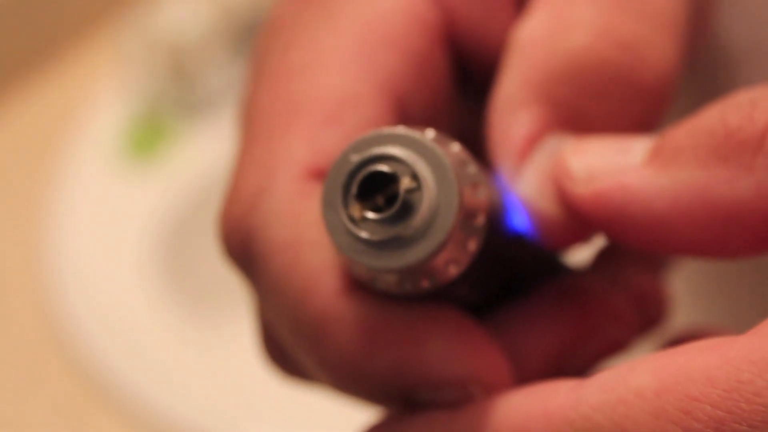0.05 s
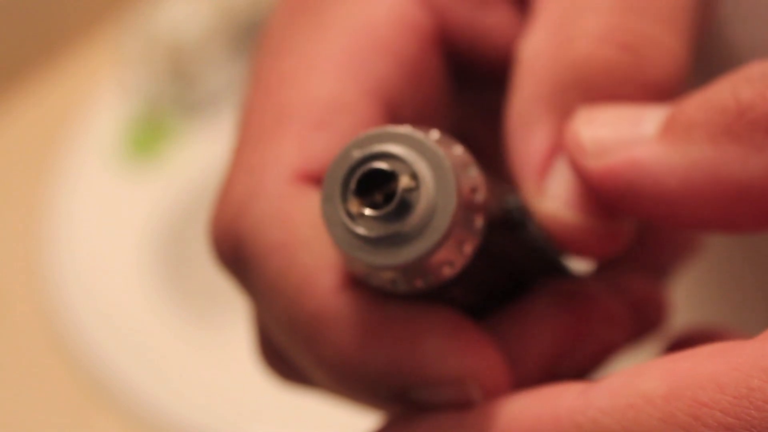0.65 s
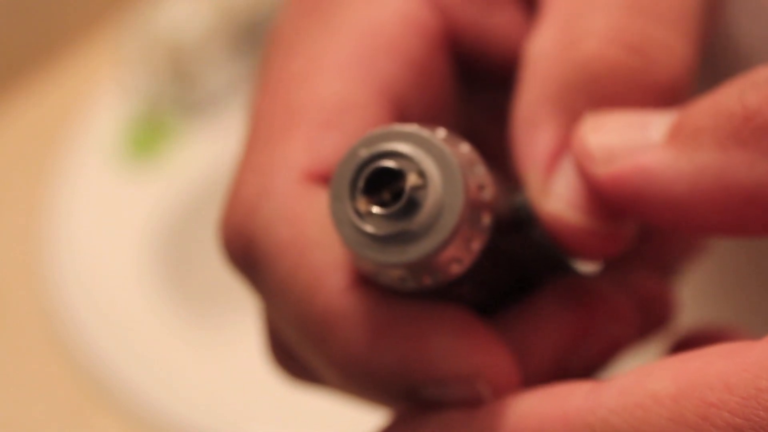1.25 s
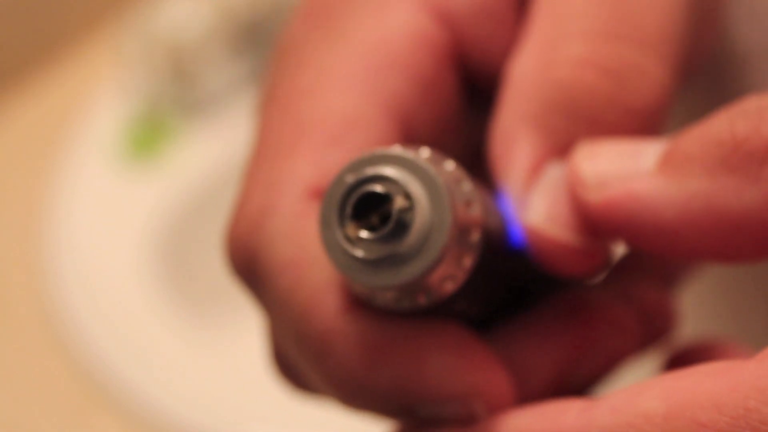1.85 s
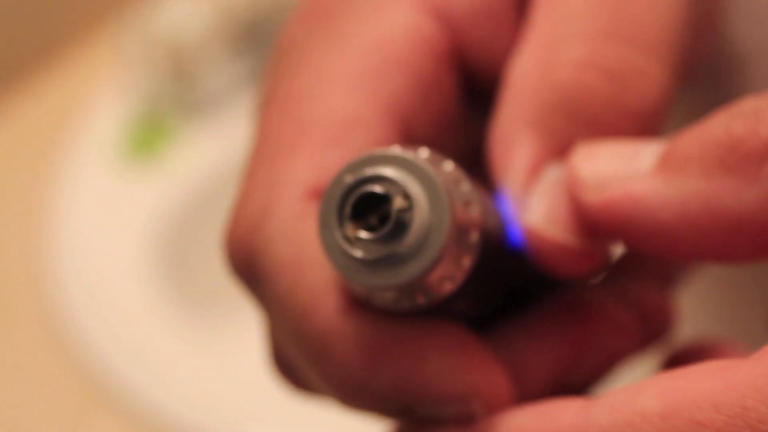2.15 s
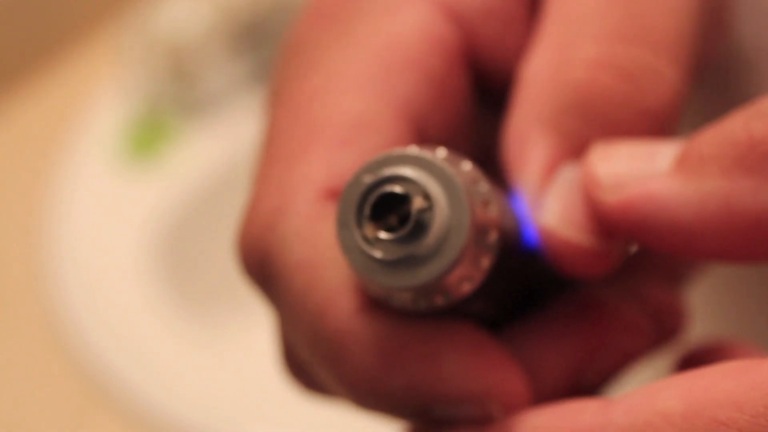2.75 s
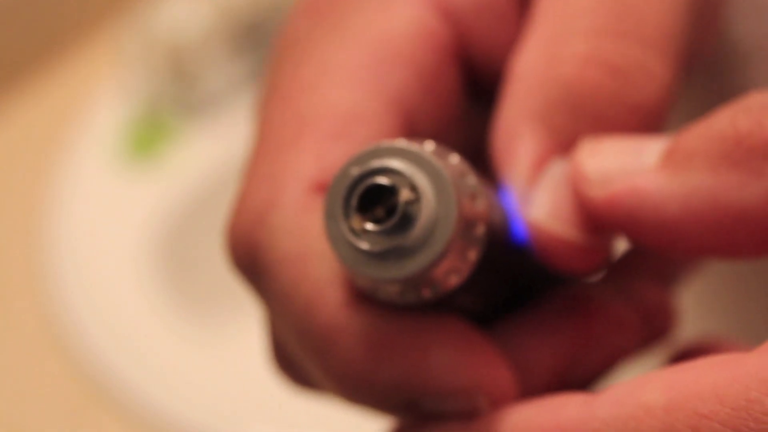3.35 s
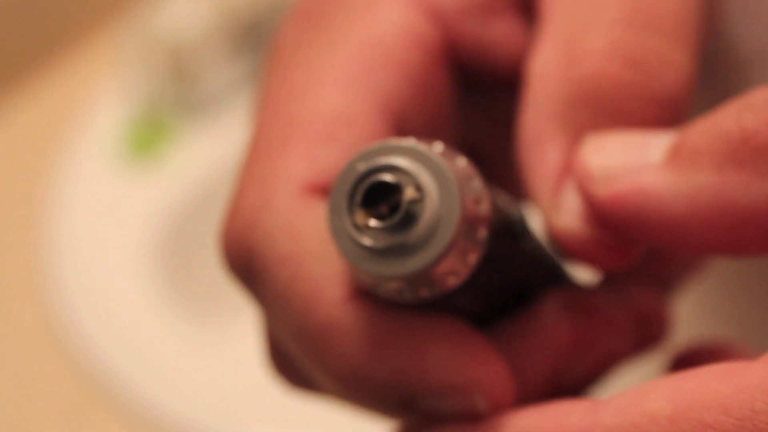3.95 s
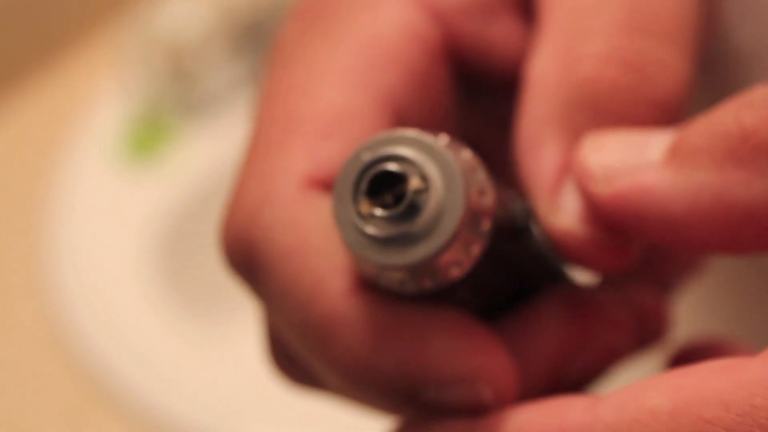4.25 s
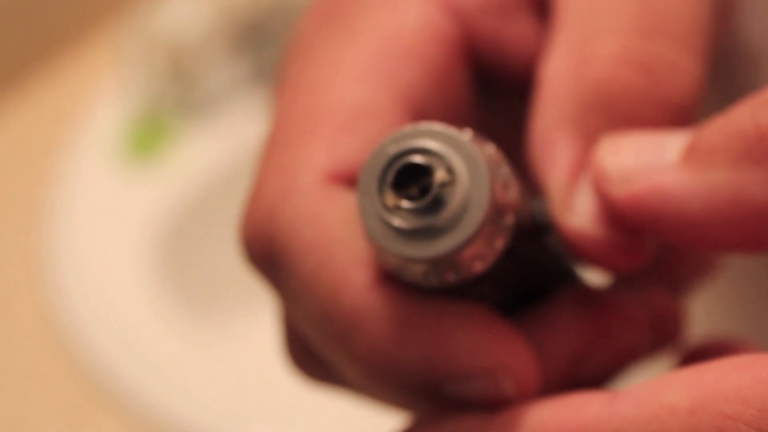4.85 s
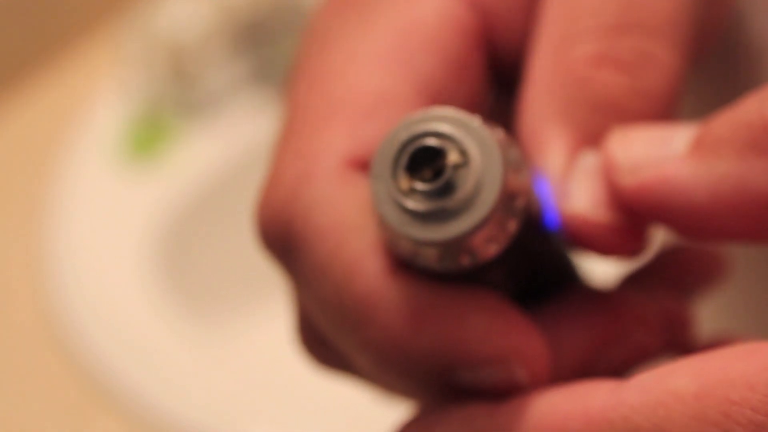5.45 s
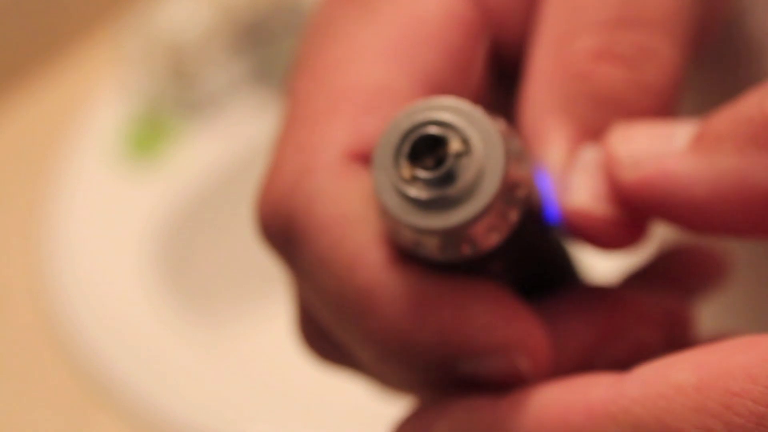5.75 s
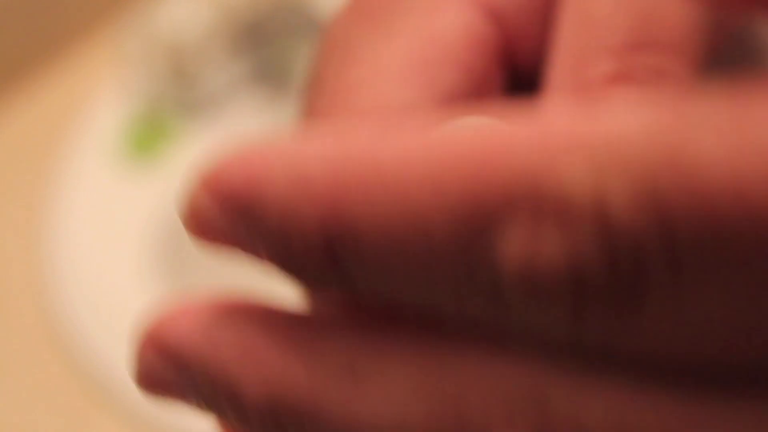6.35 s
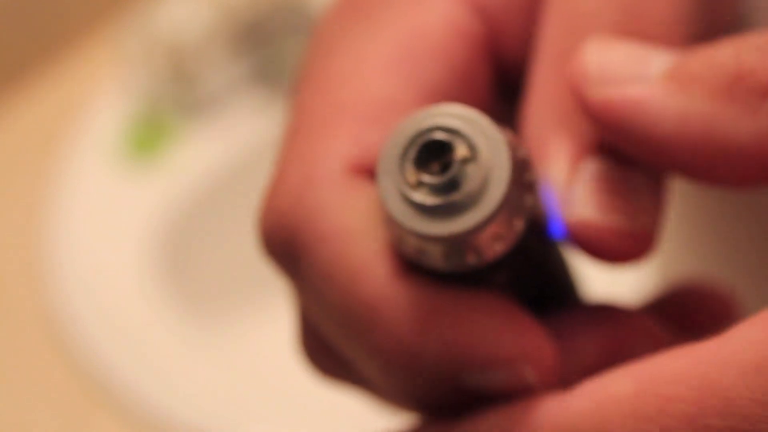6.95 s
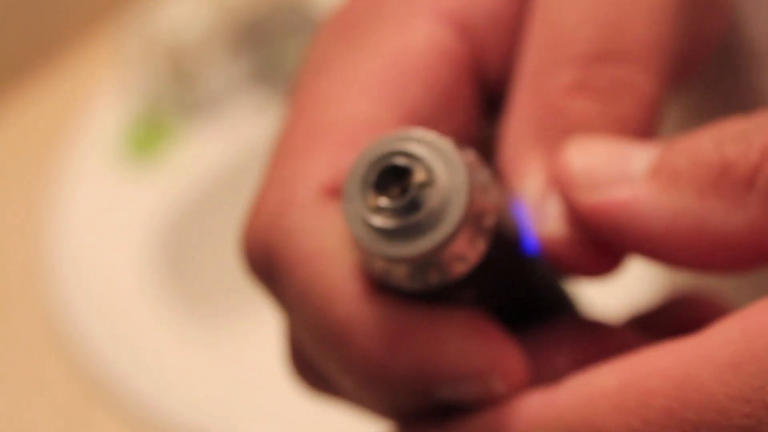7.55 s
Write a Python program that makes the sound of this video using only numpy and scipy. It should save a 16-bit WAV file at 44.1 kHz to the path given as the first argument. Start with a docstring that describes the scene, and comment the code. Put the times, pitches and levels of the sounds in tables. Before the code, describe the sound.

A bare vape coil is fired three times, close to the microphone in a small quiet room with soft background noise and a faint mains hum. A thin, bright sizzle is there from the start and cuts off with sharp pops at 0.3 seconds. After a pause and a faint click, the coil fizzes again from 1.8 seconds, with a brief spit and scattered crackles and pops. From 3.1 seconds it spits in a fast, accelerating rattle, stopping at 3.9. The cooling metal ticks faintly once at about 4 seconds. The third firing starts at 5.3 seconds and is louder, with the sharpest pops around 5.5 and another rapid spitting rattle until 6.3. The sizzle shifts slightly in tone around 6.5 seconds as a hand passes over it, then keeps hissing and crackling, slowly growing, until the end at about 7.7 seconds.

```python
"""A bare vape coil is fired three times, close to the microphone in a small quiet room.
As the wire warms, liquid on it fizzes and crackles, bursts in sharp pops and at times spits in a fast
regular rattle. Each burst is a spike coloured by the metal cup round the coil. The cooling metal ticks
once; a passing hand shades and reflects the sound. Soft room noise and mains hum lie underneath."""
import sys
import numpy as np
from scipy import signal
from scipy.fft import rfft, irfft
from scipy.io import wavfile
from scipy.ndimage import map_coordinates

SR = 44100
rng = np.random.default_rng(int(sys.argv[2]) if len(sys.argv) > 2 else 0)


def log_audio(samples):
    """Write samples as a 16-bit WAV file to the path given in sys.argv[1]."""
    # one column per channel
    frames = np.atleast_2d(samples).T
    # limit to full scale, then quantise
    limited = np.clip(frames, -1, 1)
    pcm = np.round(limited * 32767).astype(np.int16)
    wavfile.write(sys.argv[1], SR, pcm)


N = 340452
TIME_S = np.arange(N) / SR

# coil firings: (on [s], off [s], hot fizz level [dB], growth [dB/s])
FIRINGS = [(-.3, .318, -44.5, -1), (1.842, 3.87, -45, -0.3), (5.29, 7.8, -38.5, 1.45)]
# spectrum of one burst: (frequency [Hz], level [dB])
BURST_SPECTRUM = [(750, -15.5), (1200, -16), (2200, -13), (3800, -11), (5200, -6.5), (8000, -3.5),
                  (9200, -1), (10300, -0.5), (13000, 3), (14500, 3), (16000, -8.5)]
# air resonances of the cup: (centre [Hz], width [Hz], lift [dB])
CUP_RESONANCES = [(1524, 420, 7), (2020, 190, 4), (3035, 680, 7), (4370, 240, 7.5), (6830, 380, 8.5),
                  (9120, 360, -10.5), (11830, 520, 2), (13800, 300, -3.5)]
# room noise: (frequency [Hz], relative density [dB])
NOISE_SPECTRUM = [(20, 2), (40, -8), (80, -7), (160, -3), (300, -.8), (600, 0), (1500, -1.8), (3000, -3.8),
                  (6000, -7.3), (9500, -11), (16000, -9.3)]
# sharp pops and one faint click: (time [s], level [dB], tilt [dB/oct], colour peak [Hz])
POPS = [(0.1164, -17, 0, 2800), (0.148, -14, 3, 4700), (0.1592, -16.5, 0, 6200), (0.3172, -16, 3, 1200),
        (0.3196, -7.5, -1, 6860), (0.3211, -4, -3, 7100), (1.7632, -28.5, 1, 11400),
        (1.842, -23.5, 5, 11200), (1.875, -13.8, 3, 5900), (1.9655, -14.5, 0.5, 1400),
        (2.0228, -14.5, -1, 6200), (2.0423, -18, -1, 1600), (2.053, -15.5, -2, 7900),
        (2.1748, -16, -0.2, 4300), (2.4317, -10, 1.5, 4000), (2.4877, -19, -4, 8300),
        (2.4925, -15.5, -0.5, 1600), (2.6306, -19, -3.5, 5700), (2.9236, -18.5, -3.5, 6500),
        (2.9746, -12, -2, 1700), (3.0206, -12.5, 4, 6500), (3.0586, -17.5, 0, 6000), (3.084, -15, 1, 5500),
        (3.596, -15.5, -1, 12900), (3.8131, -12.5, -1.5, 3160), (3.8416, -12.5, -1, 6500),
        (5.3068, -20.5, 3, 4300), (5.4102, -7, -2, 4300), (5.4436, -12.5, 1.5, 6400),
        (5.5118, -2, -0.5, 8200), (5.5283, -2.8, -1, 9700), (5.6414, -11.5, 0, 6650),
        (5.6785, -9.5, -1.5, 7600), (5.6918, -9.5, 0.5, 6500), (5.743, -8, -2, 6000),
        (6.1551, -10, 5, 4300), (6.3458, -8, -1, 13600), (6.76, -10.5, -0.5, 9100), (6.821, -11, 6, 2390)]
# spit runs: (start [s], end [s], first rate [1/s], last rate [1/s], first level [dB], last level [dB])
SPIT_RUNS = [(1.845, 2.001, 460, 285, -30, -22.5), (3.09, 3.87, 93, 397, -18.5, -27),
             (5.289, 5.404, 270, 420, -31, -28), (5.559, 6.329, 140, 250, -21, -27.5)]
# cooling ticks: (time [s], level [dB])
TICKS = [(3.9638, -32.5)]
# modes of the metal: (frequency [Hz], level [dB], t60 [s])
METAL_MODES = [(2430, -6, 0.0035), (3520, -1, 0.0022), (6660, -10, 0.0039), (9110, -13, 0.07),
               (9400, -18, .08)]
# reflections off hands and nearby gear: (delay [ms], level [dB])
ECHOES = [(.66, -14), (2.58, -17)]
# room decay: (frequency [Hz], t60 [s])
ROOM_DECAY = [(500, .33), (3000, .33), (7000, .3), (14000, .25)]


def from_db(db):
    """Decibels to gain."""
    return 10 ** (np.asarray(db) / 20)


def unit_rms(x):
    """Scale to rms 1."""
    return x / np.sqrt(np.mean(x ** 2) + 1e-20)


def at_hz(table, hz):
    """Interpolate a table over log frequency."""
    knots_hz, values = np.array(table).T
    return np.interp(np.log(np.maximum(hz, 1)), np.log(knots_hz), values)


def resonance_db(resonances, hz):
    """Sum of bell-shaped lifts."""
    return sum(db / (1 + (2 * (hz - centre_hz) / width_hz) ** 2) for centre_hz, width_hz, db in resonances)


def convolve(x, response):
    """Apply an impulse response; keep N samples."""
    return signal.fftconvolve(x, response)[:N]


def min_phase(curve_db, size=2048):
    """Minimum-phase impulse response of a function from Hz to dB."""
    hz = np.arange(size // 2 + 1) * SR / size
    cepstrum = irfft(np.log(from_db(curve_db(hz))))
    cepstrum[1:size // 2] *= 2
    cepstrum[size // 2 + 1:] = 0
    return irfft(np.exp(rfft(cepstrum)))


def drift(knots_per_s):
    """Random wander between unit-normal knots."""
    knots = rng.standard_normal(4096)
    return np.interp(TIME_S * knots_per_s, np.arange(len(knots)), knots)


def add(out, time_s, sound):
    """Mix a short sound in."""
    start = min(max(round(time_s * SR), 0), N)
    out[start:start + len(sound)] += sound[:N - start]


def burst(tilt_db_oct=0, ringing=1, peaks=(), pivot_hz=11000, low_cut_hz=600):
    """One burst: a spike with a short ring from the cup. So small a source radiates little bass."""
    def plain_db(hz):
        bass_loss_db = 10 * np.log10(1 + (low_cut_hz / np.maximum(hz, 50)) ** 4)
        return at_hz(BURST_SPECTRUM, hz) - bass_loss_db + ringing * resonance_db(CUP_RESONANCES, hz)

    def coloured_db(hz):
        octaves = np.log2(np.maximum(hz, BURST_SPECTRUM[0][0]) / pivot_hz)
        return plain_db(hz) + tilt_db_oct * octaves + resonance_db(peaks, hz)
    plain_peak = np.abs(signal.hilbert(min_phase(plain_db))).max()
    return min_phase(coloured_db) / plain_peak


def heat_db(time_s, on_s, off_s, cold_db=-19.5, warm_up_s=0.17, cooling_db_per_s=608):
    """Boiling level relative to full heat: climbs as the wire warms, falls with the power off."""
    coldness = np.clip(1 - (time_s - on_s) / warm_up_s, 0, 1)
    return cold_db * coldness - cooling_db_per_s * np.clip(time_s - off_s, 0, 1)


def fizz(mild_db=-43, mild_per_s=6000, fierce_db=-35, spread_db=7.5, gain_db=-1.26, flutter_db=0.4):
    """Tiny bubbles burst at random; fiercer boiling is denser, louder and brighter."""
    level = np.zeros(N)
    for on_s, off_s, hot_db, growth_db_per_s in FIRINGS:
        level_db = hot_db + growth_db_per_s * (TIME_S - on_s) + heat_db(TIME_S, on_s, off_s)
        level += (TIME_S >= on_s) * from_db(level_db)
    chance = np.clip(mild_per_s / SR * level / from_db(mild_db), 1e-4, 1)
    sizes = unit_rms(from_db(spread_db * np.minimum(rng.standard_normal(N), 1.66)))
    clicks = (rng.random(N) < chance) * sizes * rng.choice([-1, 1], N) / np.sqrt(chance)
    clicks *= level * from_db(gain_db + flutter_db * drift(40)) / np.linalg.norm(burst())
    fierceness = np.clip(level / from_db(fierce_db), 0, 1)
    mild = convolve(clicks * (1 - fierceness), burst(tilt_db_oct=-2.0, ringing=0.85))
    fierce = convolve(clicks * fierceness, burst(tilt_db_oct=0.05, ringing=0.64))
    return mild + fierce


def background(noise_rms_db=-55.5, hum_hz=121.4, hum_rms_db=-77):
    """Steady room noise and faint mains hum."""
    colour = min_phase(lambda hz: at_hz(NOISE_SPECTRUM, hz), size=8192)
    noise = unit_rms(convolve(rng.standard_normal(N), colour))
    hum = np.sqrt(2) * np.sin(2 * np.pi * hum_hz * TIME_S)
    return from_db(noise_rms_db) * noise + from_db(hum_rms_db) * hum


def crackles(rate_per_s=14, typical_db=-20, spread_db=4, tilt_db_oct=0.9, spread_db_oct=3):
    """Small droplets burst at random while the coil is powered."""
    out = np.zeros(N)
    for on_s, off_s, _, _ in FIRINGS:
        times_s = on_s + np.cumsum(rng.exponential(size=128)) / rate_per_s
        for time_s in times_s:
            strength, brightness = rng.uniform(-1, 1, size=2)
            if 0 < time_s < off_s:
                level_db = typical_db + spread_db * strength + heat_db(time_s, on_s, off_s)
                crackle = burst(tilt_db_oct + spread_db_oct * brightness, ringing=0.91)
                add(out, time_s, from_db(level_db) * crackle)
    return out


def pops(gain_db=-1.5, colour_width_hz=1300, colour_lift_db=5):
    """Sharp pops, and one faint click just before the second firing; each has a slight spectral peak."""
    out = np.zeros(N)
    for time_s, level_db, tilt_db_oct, colour_hz in POPS:
        pop = burst(tilt_db_oct, ringing=0.94, peaks=[(colour_hz, colour_width_hz, colour_lift_db)])
        add(out, time_s, from_db(level_db + gain_db) * pop)
    return out


def spits(jitter=0.1, spread_db=0.9):
    """Liquid creeps onto the wire and flashes off repeatedly; rate and level glide through each run."""
    clicks = np.zeros(N)
    for start_s, end_s, first_per_s, last_per_s, first_db, last_db in SPIT_RUNS:
        running = (TIME_S >= start_s) & (TIME_S < end_s)
        progress = np.clip((TIME_S - start_s) / (end_s - start_s), 0, 1)
        rate_per_s = first_per_s * (last_per_s / first_per_s) ** progress * np.exp(jitter * drift(200))
        count = np.ceil(np.cumsum(rate_per_s * running) / SR)
        level_db = first_db + (last_db - first_db) * progress + spread_db * rng.standard_normal(N)
        clicks += np.diff(count, prepend=0) * from_db(level_db)
    return convolve(clicks, burst(tilt_db_oct=0.43, ringing=0.82))


def ticks():
    """The metal slips as it shrinks and rings briefly."""
    out, age_s = np.zeros(N), TIME_S[:SR // 5]
    for time_s, level_db in TICKS:
        for hz, mode_db, t60_s in METAL_MODES:
            envelope = from_db(level_db + mode_db - 60 * age_s / t60_s)
            add(out, time_s, envelope * np.sin(2 * np.pi * hz * age_s))
    return out


def passing_hand(x, covering, nearby, shadow=0.3, shadow_hz=3500, echo=0.2, near_s=0.0003, far_s=0.0009,
                 palm_hz=2900, palm_width_hz=1200, palm_db=-7):
    """Direct path past a hand: it shades the treble and reflects; the hollow palm resonates."""
    high_pass = min_phase(lambda hz: -10 * np.log10(1 + (shadow_hz / np.maximum(hz, 20)) ** 2))
    direct = x - shadow * covering * convolve(x, high_pass)
    delay_s = far_s + (near_s - far_s) * nearby  # sweeps notches through the fizz
    reflection = echo * nearby * map_coordinates(x, [(TIME_S - delay_s) * SR], order=3)
    hollow = signal.lfilter(*signal.iirpeak(palm_hz, palm_hz / palm_width_hz, fs=SR), x)
    beside_coil = np.sqrt(nearby) * (1 - covering)
    return direct + reflection + from_db(palm_db) * beside_coil * hollow


def scatter(near_db=-8.5, near_t60_s=0.069, onset_s=0.0011, tail_db=-8, tilt_db_oct=-2, build_s=0.002):
    """Diffuse response: scatter off nearby things, plus a room tail that dies sooner in the treble."""
    age_s = TIME_S[:SR // 2]
    near = rng.standard_normal(len(age_s)) * from_db(-60 * age_s / near_t60_s) * (age_s > onset_s)
    tail, edges_hz = 0, np.geomspace(200, 18000, 11)
    for low_hz, high_hz in zip(edges_hz, edges_hz[1:]):
        hz = np.sqrt(low_hz * high_hz)
        band_pass = signal.butter(2, [low_hz, high_hz], "band", fs=SR, output="sos")
        band = signal.sosfilt(band_pass, rng.standard_normal(len(age_s)))
        tail += band * from_db(tilt_db_oct * np.log2(hz) - 60 * age_s / at_hz(ROOM_DECAY, hz))
    tail *= 1 - np.exp(-age_s / build_s)
    return from_db(near_db) * near / np.linalg.norm(near) + from_db(tail_db) * tail / np.linalg.norm(tail)


def room(x, hand_s=6.56, hand_half_s=0.15, sway_rad=0.46, sway_per_s=1.147, sweep_rad=1.5):
    """Path past the hand, two fixed echoes, and diffuse sound that shifts as the hands move."""
    hand_offset = (TIME_S - hand_s) / hand_half_s
    covering, nearby = np.exp(-hand_offset ** 2), np.exp(-(hand_offset / 2) ** 2)
    echoes = sum(from_db(db) * np.pad(x, (round(ms * SR / 1000), 0))[:N] for ms, db in ECHOES)
    # swaying grip and passing hand crossfade two reflection patterns
    blend_rad = sway_rad * drift(sway_per_s) + sweep_rad * covering
    diffuse = convolve(x * np.cos(blend_rad), scatter()) + convolve(x * np.sin(blend_rad), scatter())
    return passing_hand(x, covering, nearby) + echoes + diffuse


def scene():
    """Coil in the room; one microphone feeds both channels."""
    coil = fizz() + spits() + pops() + crackles() + ticks()
    mono = room(coil) + background()
    return np.array([mono, mono])


def record(dry, cutoff_hz=15850):
    """Steep low-pass."""
    low_pass = signal.firwin(255, cutoff_hz, fs=SR)
    return signal.fftconvolve(dry, low_pass[None], mode="same", axes=1)


dry = scene()
out = record(dry)
log_audio(out)
```